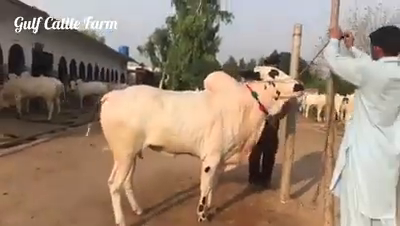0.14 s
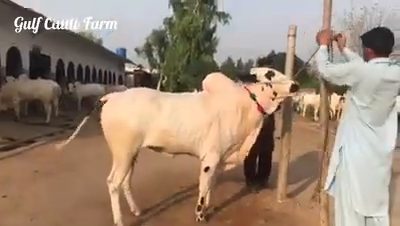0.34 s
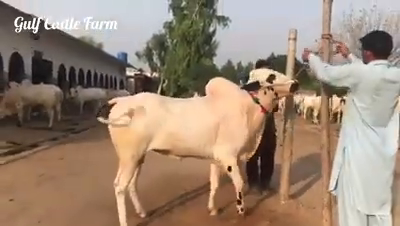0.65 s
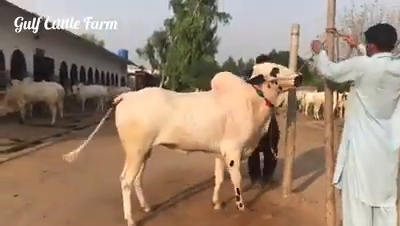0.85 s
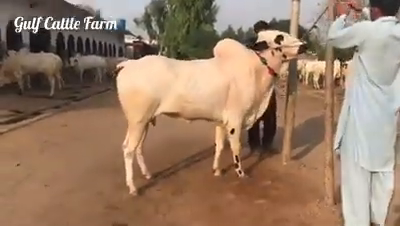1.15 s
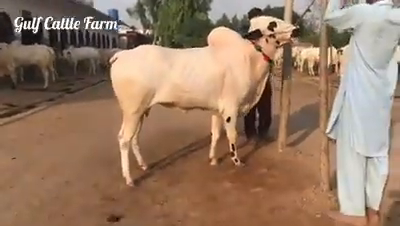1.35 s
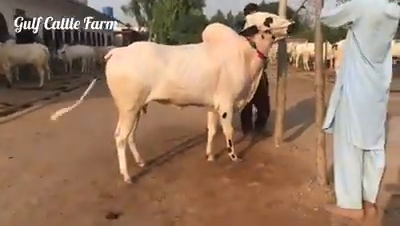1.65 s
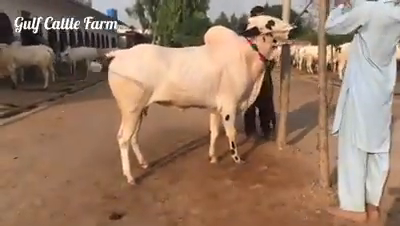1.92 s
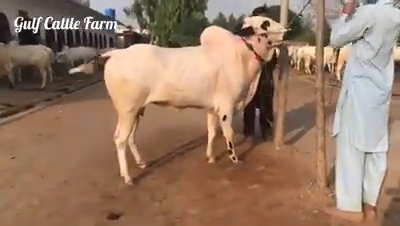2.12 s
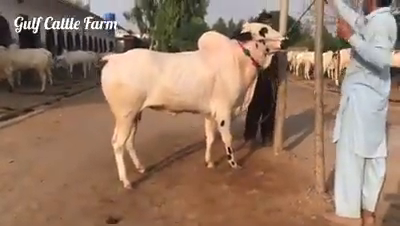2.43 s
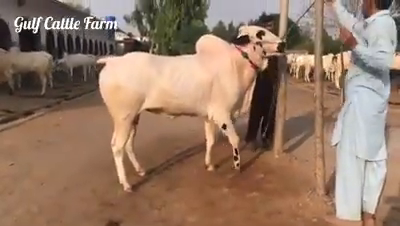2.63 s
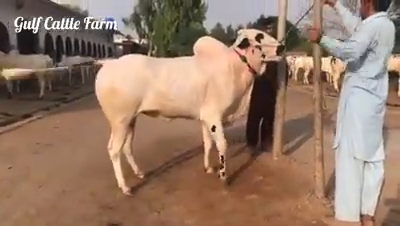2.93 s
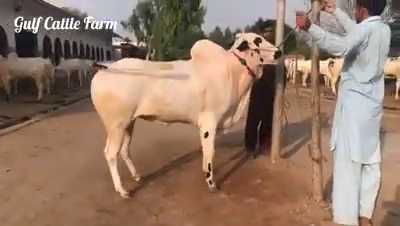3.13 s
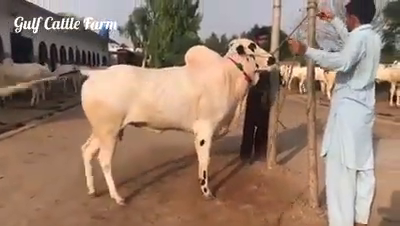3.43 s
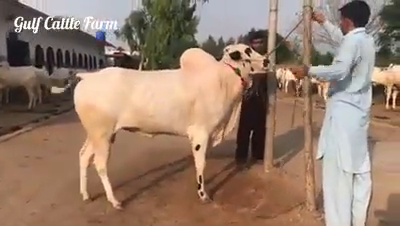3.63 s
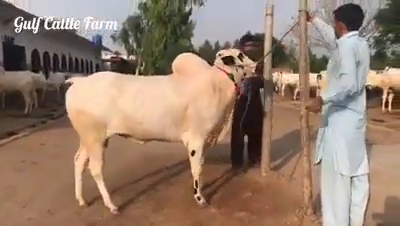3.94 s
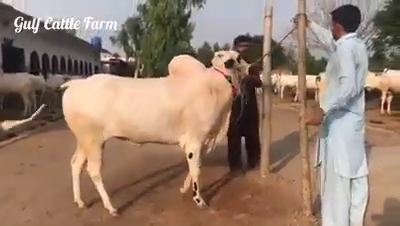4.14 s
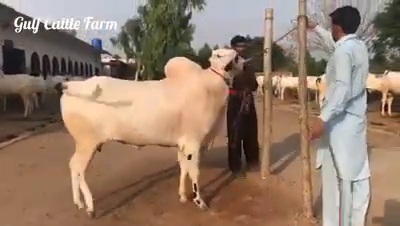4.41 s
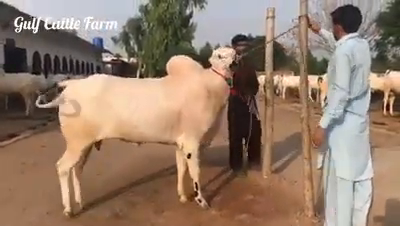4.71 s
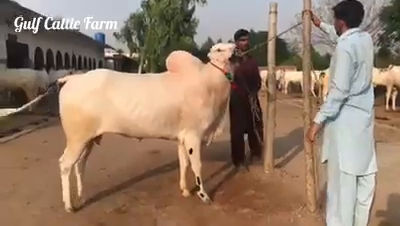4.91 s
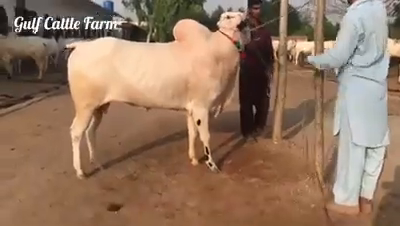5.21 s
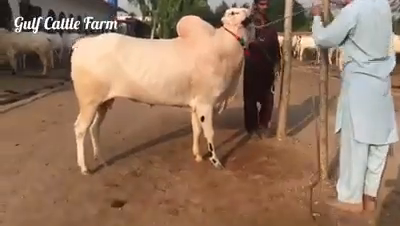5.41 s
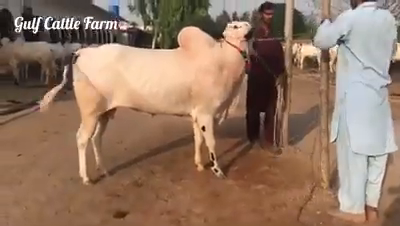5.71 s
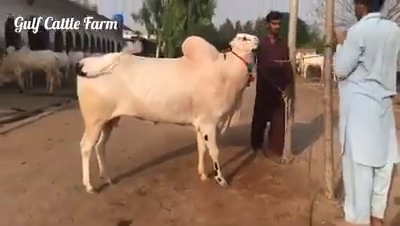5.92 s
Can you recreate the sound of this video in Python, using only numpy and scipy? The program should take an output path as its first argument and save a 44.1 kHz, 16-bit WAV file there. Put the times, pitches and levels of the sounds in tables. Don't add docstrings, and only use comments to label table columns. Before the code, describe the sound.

An outdoor cattle yard, about six seconds, heard from one microphone near the bull. Throughout, open air hisses softly, a distant diesel pump thuds low and fast, and straw rustles faintly. From 0.1 s a small neck bell clinks irregularly, with a stronger clank near 0.85 s and a quick run of clinks from 1.3 to 2.3 s, each a bright metallic tap with tiny chatter. Dry rope ticks and dull hoof scuffs fall between them, with very faint far animal and bird calls. At 2.4 s the bull grunts and breathes, then moos once, loud and low, rising slightly until 2.9 s, sagging, and breaking into hoarse slaps and breath from 3.55 to about 4 s, with slight wall echo. Sharp ticks sound around 3.2 and 3.8 s. Soft clinks return at 4.05 and 4.4 s, then clearer ones at 4.7 to 4.95 s. Scuffs and ticks near 5.5 s close the scene.

```python
import sys
import numpy as np
from scipy import signal
from scipy.fft import rfft, irfft, next_fast_len
from scipy.io import wavfile
from scipy.ndimage import uniform_filter1d, map_coordinates

SR = 44100
rng = np.random.default_rng(int(sys.argv[2]) if len(sys.argv) > 2 else 0)


def linear_from_db(decibels):
    return 10 ** (np.asarray(decibels, float) / 20)


def put_to_file(sound):
    columns = np.atleast_2d(sound).T
    safe = np.clip(columns, -1, 1)
    whole_steps = np.round(safe * 32767)
    wavfile.write(sys.argv[1], SR, whole_steps.astype(np.int16))


N = 267246
T = np.arange(N) / SR
BOUNCE = .018


def unit(x):
    return x / np.sqrt(np.mean(x ** 2) + 1e-20)


def along(points, hz):
    f, v = np.transpose(points)
    return np.interp(np.log(hz + 1), np.log(f + 1), v)


def curves(rows):
    s, *cols = np.transpose(rows)
    return [np.interp(T, s, c) for c in cols]


def after(s):
    return np.maximum(T - s, 0)


def gate(start, end, fade):
    return np.clip(np.minimum(T - start, end - T) / fade, 0, 1) ** 2


def swells(rows, rise, fall):
    gain = 0
    for s, hold, db in rows:
        gain = gain + linear_from_db(db - rise * np.maximum(s - T, 0) - fall * after(s + hold))
    return gain


def wobble(rate):
    return map_coordinates(rng.standard_normal(int(N * rate / SR) + 4), [T * rate])


def resonances(modes, f):
    total = 0
    for k, (c, w, db) in enumerate(modes):
        total = total + (-1) ** k * linear_from_db(db) * 1j * f * w / (c * c - f * f + 1j * f * w)
    return total


def filtered(x, response):
    m = next_fast_len(N + SR // 2)
    return irfft(rfft(x, m) * response(np.fft.rfftfreq(m, 1 / SR)), m)[:N]


def add(track, s, sound):
    part = track[round(s * SR):][:len(sound)]
    part += sound[:len(part)]


def puff(hz, width, t60, attack, hold=0):
    t = np.arange(SR // 4) / SR
    f = np.fft.rfftfreq(len(t), 1 / SR) + 1
    band = np.exp(-(np.log2(f / hz) / width) ** 2)
    noise = irfft(rfft(rng.standard_normal(len(t))) * band, len(t))
    return unit(noise) * linear_from_db(-60 * np.maximum(t - hold, 0) / t60) * (1 - np.exp(-t / attack))


def patchy(depth_db, size):
    z = signal.stft(rng.standard_normal(N), nperseg=512)[2]
    field = uniform_filter1d(uniform_filter1d(rng.standard_normal(z.shape), size, 0), 10, 1)
    return signal.istft(z * linear_from_db(depth_db * unit(field)), nperseg=512)[1][:N]


def moo():
    # t/s, f/Hz
    pitch_points = [(2.46, 118.8), (2.524, 123.8), (2.564, 133.4), (2.69, 134.3), (2.78, 139), (2.9, 141.8),
                    (3.05, 135.2), (3.16, 125), (3.41, 121.6)]
    # t/s, level/dB, throat opening/0-1
    effort = [(2.48, -24, .02), (2.564, -16, 0.13), (2.72, -26, 0.49), (2.86, -30.5, 0.85),
              (3.04, -17, 0.68), (3.14, -22.5, 0.48), (3.21, -18.5, 0.62), (3.42, -18, 0.51),
              (3.55, -26.5, 0.29)]
    # t/s, f/Hz, mouth level/dB
    jaw = [(2.48, 630, -39.5), (2.58, 790, -27), (2.73, 797, -31), (2.84, 1116, -41), (3.0, 1170, -41.5),
           (3.06, 910, -28.5), (3.16, 800, -38), (3.4, 749, -38.5), (3.47, 833, -33)]
    # t/s, roughness/0-1
    hoarse = [(2.44, .5), (2.6, .07), (3.0, .07), (3.1, .25), (3.2, .2), (3.4, .2), (3.5, .35), (3.62, .7),
              (3.76, 1)]
    # f/Hz, level/dB
    chest = [(100, -44.5), (120, -41.5), (140, -37.5), (450, -45), (490, -40), (525, -44), (552, -28.5),
             (580, -50)]
    # f/Hz, width/Hz, level/dB
    mouth_cavities = [(1075, 50, -5), (680, 84, -14), (950, 46, -6.5), (1180, 100, -15)]
    # f/Hz, width/Hz, level/dB
    nose = [(1220, 35, 8), (1565, 124, 7.5), (1987, 184, 7.5), (2388, 230, 2.5), (3300, 450, -7.5),
            (3900, 210, -8.5), (4700, 310, -20)]
    release = 92

    pitch = np.maximum(curves(pitch_points)[0] - 540 * after(pitch_points[-1][0]) ** 2, 104.6)
    effort_db, opening = curves(effort)
    ending = release * after(effort[-1][0])
    effort_db = effort_db - ending
    jaw_hz, mouth_db = curves(jaw)
    mouth_db = mouth_db - 43.5 * after(jaw[-1][0])
    nose_db = -41 - 114.5 * after(3.433)
    nose_db = nose_db + 2.5 * np.exp(-((T - 2.52) / 0.042) ** 2)
    rough, = curves(hoarse)
    phase = 2 * np.pi * np.cumsum(pitch * (1 + 0.0198 * rough * wobble(60))) / SR

    low = 0
    for k in (1, 4):
        low = low + linear_from_db(along(chest, k * pitch) - 0.41 * ending) * np.sin(k * phase)

    pharynx = [(242.7 + 123 * opening, 52, 0)]
    second, third = (np.abs(resonances(pharynx, k * pitch)) ** 2 for k in (2, 3))
    dip = linear_from_db(-10.5 * np.exp(-((3 * pitch - 406.5) / 3.2) ** 2))
    pair = second * np.sin(2 * phase + 1) + third * dip * np.sin(3 * phase + 2)
    low = low + linear_from_db(effort_db) * pair / np.hypot(second, third)
    voice = np.sqrt(2) * low * linear_from_db(2 * rough * wobble(40))

    breath = rng.standard_normal(N) * (1 + 0.85 * np.cos(phase))
    mouth = [(jaw_hz, 70, 0)] + mouth_cavities
    parts = ((mouth, range(5, 10), mouth_db, .7), (nose, range(10, 42), nose_db, .95))
    for modes, orders, db, airy in parts:
        tone, power = 0, 0
        for k in orders:
            flutter = linear_from_db(min(0.5 * k, 3.5) * wobble(14))
            gain = np.abs(resonances(modes, k * pitch)) ** 1.17 * flutter
            tone = tone + gain * np.sin(k * phase + rng.uniform(0, 2 * np.pi))
            power = power + gain * gain
        tone = tone / np.sqrt(power / 2)
        share = np.clip(airy * rough, 0, .95)
        air = unit(filtered(breath, lambda f: resonances(modes[1:], f)))
        voice = voice + linear_from_db(db) * (np.sqrt(1 - share) * tone + np.sqrt(share) * air)
    return voice * gate(2.45, 3.78, 0.032)


def rasp():
    # t/s, hold/s, level/dB
    grunts = [(2.374, .03, -43.5), (2.47, .011, -51), (3.6, .03, -37), (3.67, 0.044, -29.5),
              (3.776, .02, -31), (3.85, 0.047, -31.5), (3.95, 0.029, -49), (4.12, 0.026, -49.5)]
    # t/s, hold/s, level/dB
    breaths = [
        (2.37, .11, -48.5),
        (3.56, 0.28, -43),
    ]
    # f/Hz, width/Hz, level/dB
    throat = [(242.6, 40, 0), (346, 81, -1), (186, 55, -2.5), (432, 70, -7.5)]
    mouth = [(684, 630, 5.5), (1096, 91, 7.0), (1720, 1000, -9)]  # f/Hz, width/Hz, level/dB
    slap_share = .7

    lumps = rng.standard_normal((2, N)) * linear_from_db(1.8 * wobble(45))
    count = np.floor(np.cumsum(100 * (1 + .18 * wobble(35))) / SR)
    slaps = np.diff(count, prepend=0) * linear_from_db(1.8 * wobble(80))
    source = np.sqrt(slap_share) * unit(slaps) + np.sqrt(1 - slap_share) * unit(lumps[0])
    low = unit(filtered(source, lambda f: resonances(throat, f) ** 2))
    upper = unit(filtered(lumps[1], lambda f: resonances(mouth, f) ** 2))
    return swells(grunts, 340, 310) * low + swells(breaths, 300, 87) * upper


def shed(x):
    # f/Hz, time to fall by 60 dB/s
    walls = [(200, 0.59), (1000, 1), (4000, 0.077), (12000, 0.034)]
    hz, t, z = signal.stft(rng.standard_normal(SR), SR, nperseg=256)
    tail = signal.istft(z * linear_from_db(-60 * t / along(walls, hz)[:, None]), SR, nperseg=256)[1]
    return signal.fftconvolve(np.pad(x, (900, 0)), tail / np.linalg.norm(tail))[:N]


def ring(modes, start, shuffle_db=0):
    t = np.arange(SR * 5 // 4) / SR
    touch = np.minimum(t // BOUNCE, 5).astype(int)
    stepped = t - .7 * np.where(t < 5 * BOUNCE, t % BOUNCE, 0)
    free = linear_from_db(-32 - 60 * t / 2.6) * (1 - (t / t[-1]) ** 4)
    jumps = shuffle_db * rng.standard_normal((len(modes), 6))
    jumps[:, 0] = 0
    out = 0
    for (hz, db, t60), jump in zip(modes, jumps):
        fading = linear_from_db(jump[touch] - 60 * stepped / t60) + free * hz / 11000
        out = out + linear_from_db(db) * fading * np.sin(2 * np.pi * hz * (t + start))
    return out * (1 - np.exp(-t / 0.0011))


def bells():
    # f/Hz, t60/s
    bell = [(2032, 0.87), (4996, 0.45), (6374, 0.31), (8096, 0.13), (8922, 0.21), (10164, 0.12),
            (10852, 0.16), (12370, 0.15), (14298, 0.095)]
    # f/Hz, level against the clack/dB, t60/s
    bell_weak = [(6164, -37, .5), (11670, -30, .1), (13020, -27, .12), (5700, -28, .05), (8590, -30, .1),
                 (13470, -31, .08)]
    # t/s, clack/dB, blow on rim/dB, on shoulder/dB, on lip/dB
    blows = [(0.08, -29, -91.8, -41, -71), (0.2009, -30, -61, -49.5, -46.5),
             (0.851, -21.5, -40, -41, -95.4), (1.294, -31, -63.7, -63, -45), (1.4187, -28, -57, -59, -43.5),
             (1.5643, -25, -91, -43.8, -46), (1.691, -25, -57, -71, -53), (1.8462, -64, -86, -91, -61),
             (2.0055, -29.5, -44, -60, -67), (2.1595, -39, -75, -58, -50.5),
             (2.3136, -31.5, -47.5, -53.5, -69), (2.7847, -33, -91, -70, -60.5),
             (4.0522, -38.5, -64.5, -66, -75.2), (4.3774, -54, -78, -65, -64.5),
             (4.6687, -35, -73.2, -51.5, -53.5), (4.7504, -36, -51, -69.5, -91.7),
             (4.9367, -26, -52, -90.2, -37)]
    # rim/dB, shoulder/dB, lip/dB
    spots = [(-11.5, -10.5, -10.5), (-51, -12, -3.5), (0.0, -52.5, -5), (-18.5, -0.5, -14.5),
             (-14, -4, -47.5), (1.8, -30, -34), (-3.8, -12, -3.5), (-11, -37.5, -0.5), (-50.5, -0.5, 0)]
    late_db = [-1, -15, 1, -2, -4, -1.5, 1, -1, 1]
    # t/s, level/dB
    second = [
        (2.215, -51),
        (2.315, -56),
    ]
    # f/Hz, level/dB, t60/s
    second_bell = [(3989, 0, .5), (7407, -4, .35), (8786, -2, .25), (9520, -6, .2), (11890, 2, .16)]
    # t/s, level/dB
    third = [
        (4.07, -57),
        (4.38, -69.5),
    ]
    # f/Hz, level/dB, t60/s
    third_bell = [(1610, -8, 1), (4395, 2.5, 1)]
    # t/s, level/dB
    fourth = [
        (.87, -52),
        (2.79, -49),
    ]
    # f/Hz, level/dB, t60/s
    fourth_bell = [(5340, -5, 0.8), (6600, -5, .18)]

    out = np.zeros(N)
    for s, clack_db, *blow_db in blows:
        partial_db = 20 * np.log10(linear_from_db(spots) @ linear_from_db(blow_db))
        partial_db = partial_db + np.multiply(late_db, s > 4.5)
        main = [(hz, db + 2.5, t60) for (hz, t60), db in zip(bell, partial_db)]
        weak = [(hz, clack_db + db + rng.normal(0, 3.6), t60) for hz, db, t60 in bell_weak]
        add(out, s, ring(main + weak, round(s * SR) / SR, shuffle_db=3))
        add(out, s, linear_from_db(clack_db - 18) * puff(2800, 1.55, 0.023, 0.00038, 0.0033))
        add(out, s, linear_from_db(clack_db - 24 + rng.normal(0, 3)) * puff(5600, .16, .015, .001, BOUNCE))
        for k, drop_db in enumerate((25, 26.5, 33, 39)):
            gain = linear_from_db(clack_db - drop_db + rng.normal(0, 3))
            add(out, s + k * BOUNCE, gain * puff(rng.uniform(9000, 13500), .35, .015, .001, BOUNCE))
    for strikes, modes in ((second, second_bell), (third, third_bell), (fourth, fourth_bell)):
        for s, db in strikes:
            add(out, s, linear_from_db(db) * ring(modes, s))
    return out


def feet():
    # t/s, peak level/dB, center f/Hz, t60/s, width/octaves
    ticks = [(0.183, -43, 3500, 0.02, 1), (0.724, -44, 2710, 0.02, 2.7), (1.036, -42.5, 6200, 0.038, 2.4),
             (1.0794, -47, 6170, 0.018, 1.3), (1.106, -42, 6230, 0.028, 1.8),
             (1.278, -38, 4700, 0.045, 1.8), (1.8888, -34, 4940, 0.021, 9.9),
             (3.223, -30.5, 3040, 0.054, 1.34), (3.6514, -40, 2990, 0.019, 1.8),
             (3.8274, -34, 3050, 0.049, 1.75), (4.5173, -44, 6454, 0.02, 1.8),
             (4.5703, -45, 6490, 0.02, 1.8), (5.293, -46, 2590, 0.03, 1.4),
             (5.4427, -31.5, 3580, 0.01, 1.27), (5.6097, -45.5, 6600, 0.052, 0.98)]
    # t/s, peak level/dB, center f/Hz, t60/s
    scuffs = [(0.462, -34.5, 1020, 0.035), (0.724, -37.5, 860, 0.078), (0.89, -43.5, 880, 0.16),
              (1.464, -46.5, 1130, 0.21), (2.019, -40, 1190, 0.037), (2.249, -40, 1480, 0.069),
              (4.669, -44.5, 1000, 0.23), (4.77, -40.5, 650, 0.093), (5.334, -44, 970, 0.13),
              (5.517, -33.5, 930, 0.073), (5.554, -39.5, 1130, 0.11), (5.626, -44.5, 1130, 0.21)]
    out = np.zeros(N)
    for s, db, hz, t60, width in ticks:
        add(out, s, linear_from_db(db - 4) * puff(hz, width, t60, .0003))
    for s, db, hz, t60 in scuffs:
        add(out, s, linear_from_db(db - 6.5) * puff(hz, 0.76, t60, 0.0026))
    return out


def far_calls():
    # start t/s, end t/s, f/Hz, level/dB
    calls = [(0.173, 0.41, 208, -49), (0.286, 0.37, 590, -59.5), (0.315, 0.38, 3270, -59),
             (0.43, 0.48, 3300, -65), (0.562, 0.603, 3300, -60), (.81, 0.829, 3150, -51.5),
             (1.92, 2.115, 246, -55), (1.977, 2.104, 152, -51), (2.863, 2.885, 3320, -45),
             (3.906, 4.023, 189, -44.5), (4.04, 4.098, 3380, -58.5), (5.145, 5.227, 676, -58.5),
             (5.74, 5.83, 1010, -59.5), (5.963, 6.04, 674, -57.5)]
    out = np.zeros(N)
    for start, end, hz, db in calls:
        note = np.sin(2 * np.pi * np.cumsum(hz * (1 + 0.0105 * wobble(4.9))) / SR)
        out += linear_from_db(db) * gate(start, end, 0.2 * (end - start)) * note
    return out


def yard():
    # multiple of the turning rate, level/dB
    pump_orders = [(3, -66), (4, -62), (5, -78), (6, -52.5), (7, -57.5), (8, -51), (9, -58), (10, -75.5),
                   (12, -65.5)]
    # f/Hz, level/dB per Hz
    air_curve = [(12, -47.5), (20, -18.5), (82, -5), (163, -11.5), (500, -22), (1500, -25), (4200, -30.5),
                 (4700, -36), (5700, -36.5), (6300, -26.5), (7200, -30), (7800, -38), (10800, -43),
                 (14800, -42)]
    # f/Hz, level/dB per Hz
    straw = [(5000, -27), (7500, -2), (9000, -5), (10700, -13), (11600, 1.5), (14500, -6.5), (15000, -14.5)]
    # t/s, hold/s, level/dB
    shuffles = [(0.0, .011, -64), (.5, 0.23, -64.5), (1.04, 0.081, -55), (1.855, 0.021, -48.5),
                (2.14, .09, -68), (2.27, .05, -59), (4.07, 0.022, -49), (4.52, 0.068, -62),
                (5.25, 0.15, -56), (5.52, 0.16, -62), (5.76, 0.26, -60)]

    rumble_db = -.5 * (T - T.mean())
    hiss_db = 2.16 * wobble(4.066)
    turn = 2 * np.pi * np.cumsum(11.52 * (1 + 0.0029 * wobble(2))) / SR
    pump = 0
    for k, db in pump_orders:
        pump = pump + linear_from_db(db + 3.06 * wobble(7.5)) * np.sin(k * turn + 1.76 * wobble(2.3))

    air = patchy(1.7, size=12)
    split = lambda f: 1 / (1 + (f / 300) ** 2)
    low = filtered(air, lambda f: linear_from_db(along(air_curve, f) + 9.5) * split(f))
    high = filtered(air, lambda f: linear_from_db(along(air_curve, f) + 8.5) * (1 - split(f)))
    level = linear_from_db(-34)
    steady = linear_from_db(rumble_db) * (pump + level * low) + level * linear_from_db(hiss_db) * high

    rustle = unit(filtered(patchy(3.7, size=20), lambda f: linear_from_db(along(straw, f))))
    stir = swells(shuffles, 800, 140) + linear_from_db(-12) * swells(shuffles, 800, 18)
    return steady + linear_from_db(-7.0) * stir * rustle


def scene():
    bull = moo() + rasp()
    near = bells() + feet()
    echoes = linear_from_db(-19) * shed(bull) + linear_from_db(-16) * shed(near)
    return (bull + near + echoes + far_calls() + yard())[None]


def roll_off(x):
    return signal.sosfilt(signal.butter(12, 15960, fs=SR, output="sos"), x)


def record(dry):
    return roll_off(dry)


dry = scene()
out = record(dry)
put_to_file(out)
```